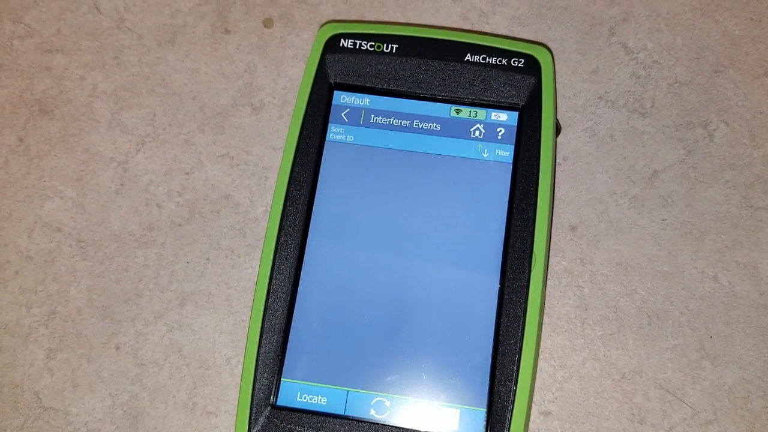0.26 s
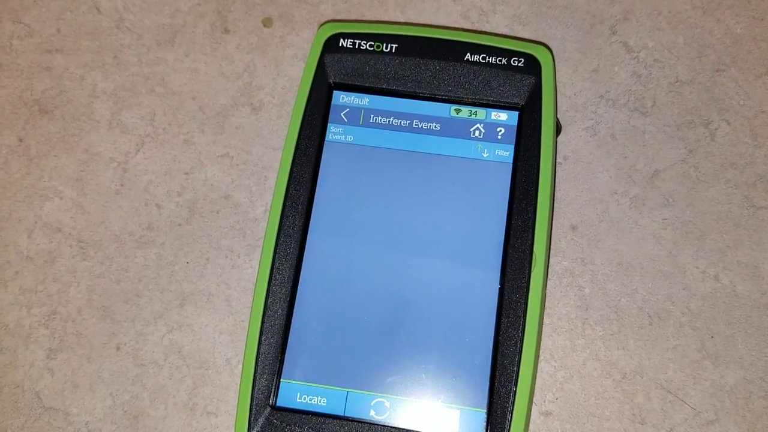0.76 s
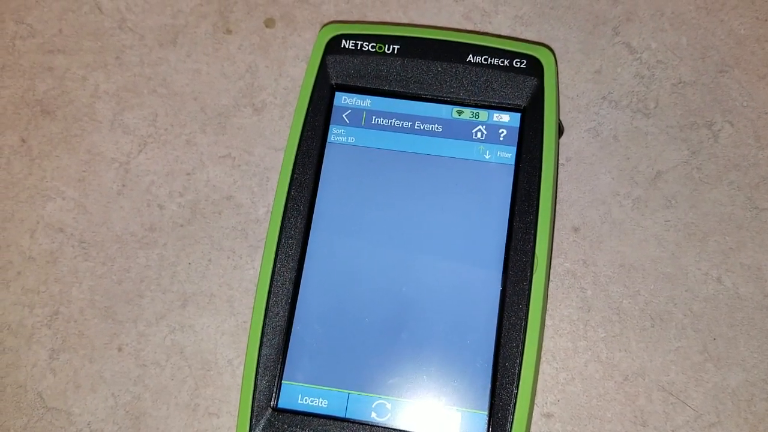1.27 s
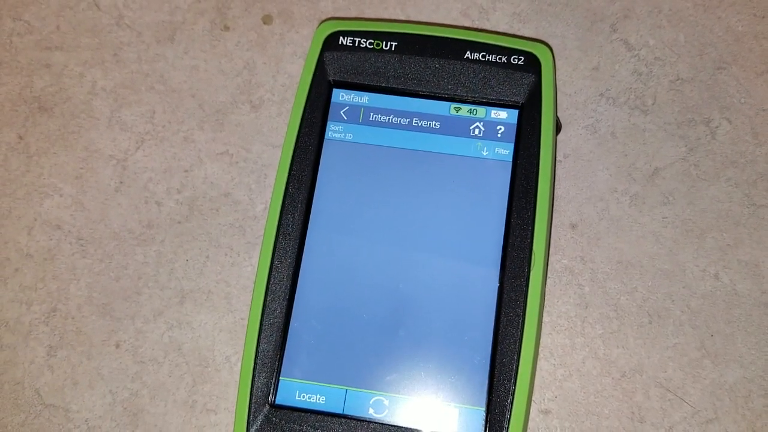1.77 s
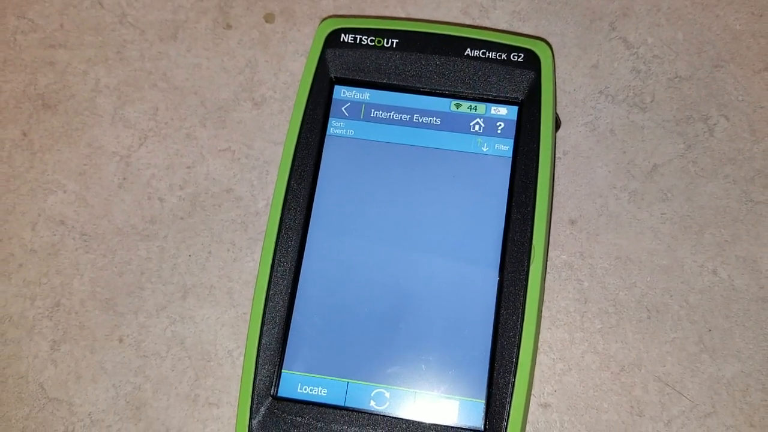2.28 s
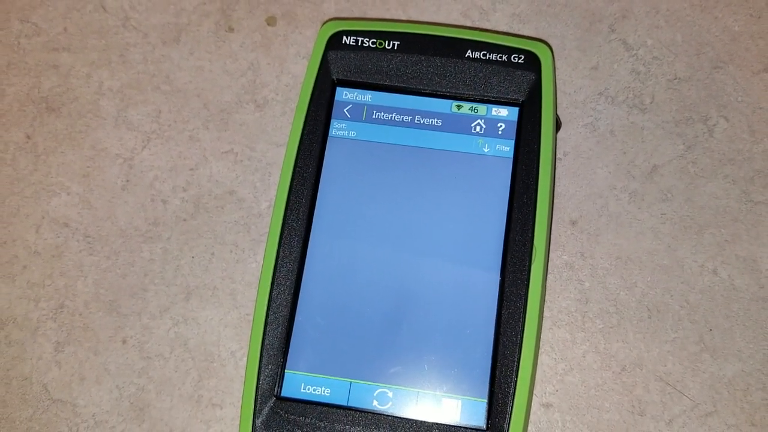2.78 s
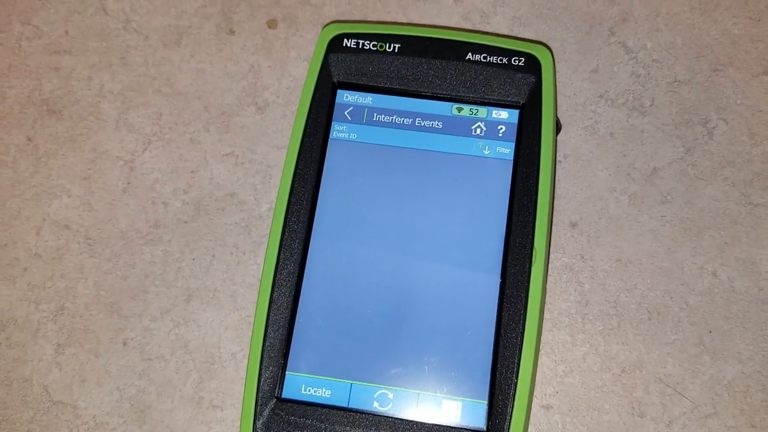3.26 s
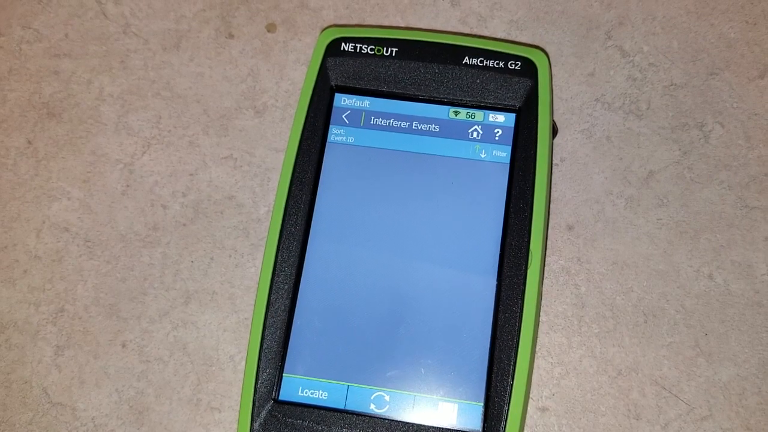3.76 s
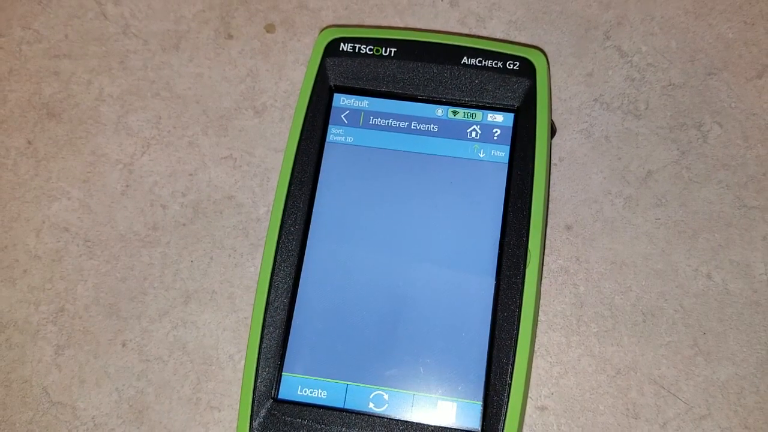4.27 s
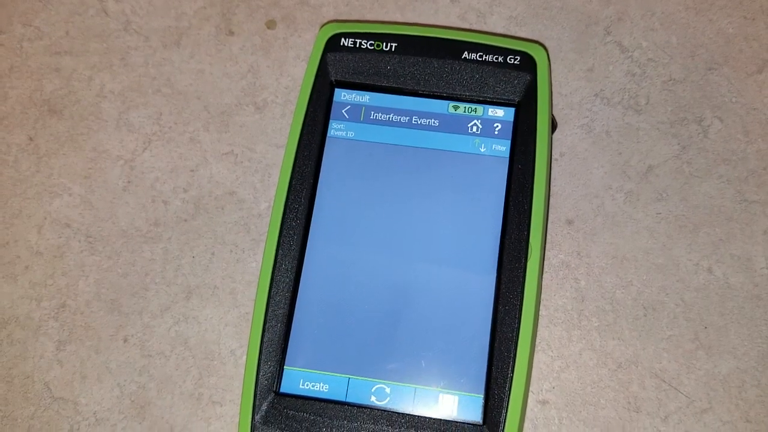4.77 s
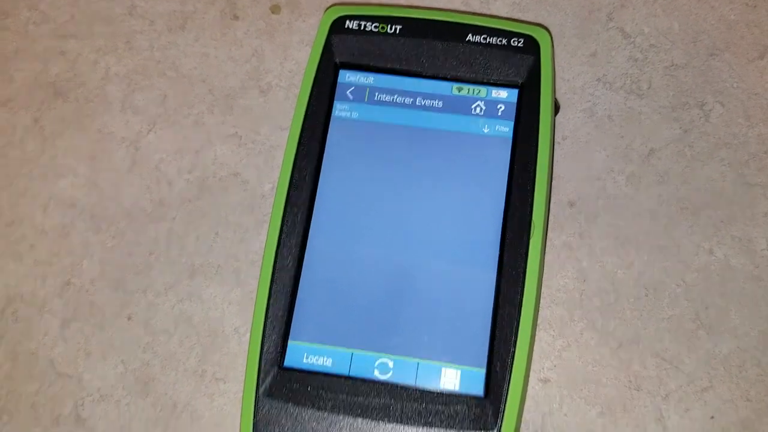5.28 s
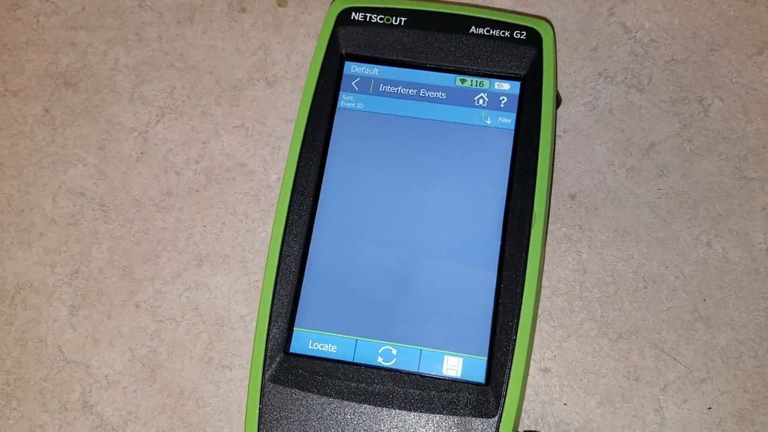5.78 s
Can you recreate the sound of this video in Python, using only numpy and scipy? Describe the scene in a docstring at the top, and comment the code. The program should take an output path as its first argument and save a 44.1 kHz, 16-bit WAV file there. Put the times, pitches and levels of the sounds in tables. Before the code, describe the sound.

Two microwave ovens hum together steadily in a room, low and droning with soft fan hiss, until small dry handling clicks come near the end.

```python
"""Two microwave ovens run in a room, heard by a hand-held pair of microphones: transformers, motors
and fans give steady sums of sines, and the transformer cores buzz on high multiples of the mains.
Shaped noise adds a rumble of thin cases and a hiss of blown air. Near the end the hand shifts its grip:
filtered bursts tick on the left, then ticks and a short chirp of ringing plastic come on the right."""
import sys
import numpy as np
from scipy import signal
from scipy.fft import rfft, irfft, next_fast_len
from scipy.io import wavfile
from scipy.ndimage import uniform_filter1d, map_coordinates

SR = 44100
rng = np.random.default_rng(int(sys.argv[2]) if len(sys.argv) > 2 else 0)


def master_out(mix):
    """Clip the mix to full scale and print it as 16-bit PCM to the path in sys.argv[1]."""
    frames = np.transpose(np.atleast_2d(mix))
    ceiling = np.clip(frames, -1, 1)
    pcm = np.round(ceiling * 32767).astype(np.int16)
    wavfile.write(sys.argv[1], SR, pcm)


N = 266275  # samples
TOP_HZ = 15730  # upper limit of the recorder


def undb(db):
    """Decibel law: amplitude gain of a level."""
    return 10 ** (np.asarray(db) / 20)


def curve(table, hz):
    """Spectral interpolation: each level column read along a logarithmic frequency axis."""
    f, *columns = np.transpose(table)
    return np.array([np.interp(np.log(hz + 1), np.log(f), c) for c in columns])


def walk(rate):
    """Slow random modulation: levels held 1 / rate s and smoothed twice, with a spread near 1."""
    hold = int(SR / rate)
    levels = np.repeat(rng.standard_normal(N // hold + 1), hold)
    smooth = uniform_filter1d(uniform_filter1d(levels, hold), hold)
    return 1.32 * smooth[:N]


# Resonances of cases and room that lift or hollow the noise.
# Each row: frequency in Hz, width in Hz, gain in dB.
RESONANCES = [(150, 6.3, 5.5), (191.6, 9.1, 4), (279.8, 23, 7), (331, 10.7, 11), (359.6, 7.7, 4.5),
              (401.4, 10.5, 7.5), (468.4, 20, 5.5), (257, 13, -5.5), (494, 13, -5.5), (556, 11, -5),
              (714, 15, 2.5), (775, 14, 3.5), (1443, 77, 3.5), (1990, 56, 3.5), (3320, 150, 2),
              (15000, 300, 2)]
RIPPLE_DB, RIPPLE_HZ = 1.4, 20.0  # spread above 800 Hz, spacing of the random knots


def colour(hz):
    """Resonance and interference: modes shape both sides, reflections ripple each side differently."""
    db = sum(lift_db / (1 + (2 * (hz - f) / width) ** 2) for f, width, lift_db in RESONANCES)
    knots = rng.standard_normal((2, 4000))
    ripple = np.array([map_coordinates(side, [hz / RIPPLE_HZ], order=3) for side in knots])
    return undb(db + RIPPLE_DB * ripple * np.clip(hz / 800, 0, 1))


LEFT_LEADS_S = 0.00023  # lead of the common noise on the left
FLICKER_DB, SWELL_DB = 1, 0.5  # spread of the top band's own flicker, and of the shared swell
# Rumble of cases and room, before crossover and resonances.
# Each row: frequency in Hz, left level in dB per Hz, right level in dB per Hz.
RUMBLE_SPECTRUM = [(26, -74, -76), (32, -82, -87), (56, -79.5, -77.5), (85, -70.5, -69), (134, -66, -67.5),
                   (197, -71.5, -67.5), (244, -73.5, -79), (284, -68, -67.5), (357, -70, -71.5),
                   (398, -75.5, -73.5), (526, -72, -72), (645, -70, -71), (772, -72, -74.5),
                   (953, -80, -80.5)]
# Air through fans and vents, then the microphones' own hiss, before crossover and resonances.
# Each row: frequency in Hz, left level in dB per Hz, right level in dB per Hz.
HISS_SPECTRUM = [(700, -90, -89), (975, -81, -85), (1190, -86.5, -81.5), (1420, -81, -83),
                 (1880, -84.5, -83.5), (2800, -89.5, -88), (3970, -91, -90.5), (5140, -99, -96.5),
                 (6500, -100, -96.5), (8440, -104, -110), (11000, -104, -109), (12500, -103, -105),
                 (14000, -101, -107), (15400, -97, -114)]
# Share of the noise power common to both microphones.
# Each row: frequency in Hz, likeness from 0 to 1.
COMMON_SHARE = [(26, .99), (140, 1), (220, 0.65), (285, 0.88), (400, 0.52), (560, 0.73), (690, 0.71),
                (900, 0.29), (2500, 0.02), (4000, 0.02)]


def air():
    """Partly coherent noise: third-octave bands swell together and flicker alone, most in the treble."""
    size = next_fast_len(N)
    hz = np.arange(size // 2 + 1) * SR / size
    rumble = undb(curve(RUMBLE_SPECTRUM, hz)) ** 2 / (1 + (hz / 1100) ** 6)
    hiss = undb(curve(HISS_SPECTRUM, hz)) ** 2 / (1 + (700 / (hz + 1)) ** 6)
    power = rumble + hiss

    like = np.clip(curve(COMMON_SHARE, hz)[0], 0, 1)
    common, left, right = rfft(rng.standard_normal((3, size)))
    lead = np.exp(2j * np.pi * hz * LEFT_LEADS_S)
    left = np.sqrt(like) * common * lead + np.sqrt(1 - like) * left
    right = np.sqrt(like) * common + np.sqrt(1 - like) * right
    both = np.sqrt(power * SR / 2) * colour(hz) * np.array([left, right])

    out = np.zeros((2, N))
    swell_db = SWELL_DB * walk(1)
    step = 3 * np.log2(hz / 20 + 1e-9)  # third octaves above 20 Hz
    for k in range(31):
        band = np.cos(np.pi / 2 * np.clip(step - k, -1, 1)) ** 2  # neighbours sum to 1
        flicker_db = FLICKER_DB * k / 30 * walk(25.02)
        out += undb(swell_db + flicker_db) * irfft(both * band, size)[:, :N]
    return out


CREEP_S, CREEP_COUNT = (5.215, 5.27), 9  # start and end
CREEP_DB, CREEP_RANGE_DB, CREEP_LEFT_DB = -40, 2, 13  # centre, plus or minus, left minus right
CREEP_LOW_HZ = (3000, 11000)  # range of the lower band edge


def creep():
    """Stick-slip crackle on the left: faint ticks at random moments, at most an octave wide."""
    when, size, pitch = rng.random((CREEP_COUNT, 3)).T
    low_hz = CREEP_LOW_HZ[0] + pitch * (CREEP_LOW_HZ[1] - CREEP_LOW_HZ[0])
    start = CREEP_S[0] + when * (CREEP_S[1] - CREEP_S[0])
    db = CREEP_DB + CREEP_RANGE_DB * (2 * size - 1)
    return [(s, level, CREEP_LEFT_DB, f, min(2 * f, TOP_HZ)) for s, level, f in zip(start, db, low_hz)]


TICK_T60_S = 0.0058  # decay of the rattle by 60 dB
TICK_DIP_HZ, TICK_DIP_WIDTH_HZ = 10200, 1800  # a dip in the ticks' treble near 10 kHz
# Dry ticks of the grip. Each row: start in seconds, peak level in dB before the treble dip is cut,
# left minus right in dB, lower band edge in Hz, upper band edge in Hz.
GRIP_TICKS = [(5.2000, -21, 16, 1100, 2300), (5.2291, -27, 14, 2100, 12000), (5.2593, -21, 18, 1800, 14000),
              (5.2824, -30, 12, 1000, 3000), (5.9312, -27, -11, 2600, 6500), (5.9453, -20, -9, 3800, 5800),
              (5.9662, -42, -4, 10000, 15000)]


def ticks():
    """Impulse excitation: a sharp snap and a very short decaying rattle pass through a broad band."""
    out = np.zeros((2, N))
    t = np.arange(400) / SR
    for start, db, pan_db, low_hz, high_hz in GRIP_TICKS + creep():
        burst = 0.17 * rng.standard_normal(len(t)) * undb(-60 * t / TICK_T60_S)
        burst[0] = 1  # the snap
        burst = signal.lfilter(*signal.butter(2, min(high_hz, TOP_HZ), fs=SR), burst)
        burst = signal.lfilter(*signal.butter(3, low_hz, "high", fs=SR), burst)
        burst[0] += 0.3 * np.abs(burst).max()  # the very edge reaches the top treble
        i = int(start * SR)
        gains = undb(db + np.minimum([pan_db, -pan_db], 0))  # the farther side is lowered
        out[:, i:i + len(t)] += np.outer(gains, burst / np.abs(burst).max())
    return signal.lfilter(*signal.iirnotch(TICK_DIP_HZ, TICK_DIP_HZ / TICK_DIP_WIDTH_HZ, fs=SR), out)


def ring(x, hz, width_hz):
    """Cascaded resonance: the envelope of one applied three times swells to 1 for a unit blow, then dies."""
    t = np.arange(512) / SR
    envelope = t ** 2 * np.exp(-np.pi * width_hz * t)
    response = envelope / envelope.max() * np.sin(2 * np.pi * hz * t)
    return signal.fftconvolve(x, response)[:len(x)]


HARD_SLIP_S, HARD_SLIP_DB = 6.0022, -11
SLIP_GAP_S, SLIP_JITTER = .0026, .15  # jitter is a fraction of the gap
SLIPS_BEFORE, SLIPS_AFTER = 4, 3
# The slopes of the small slips meet at SMALL_SLIP_DB; each step away from the hard slip lowers them.
SMALL_SLIP_DB, BUILD_DB_PER_SLIP, FADE_DB_PER_SLIP = -22, 4, 3
CHIRP_LEFT_DB = -13.5  # left minus right
# Modes of the plastic shell. Each row: frequency in Hz, width in Hz, level in dB.
SHELL_MODES = [(3070, 450, -16), (3800, 450, -17), (4540, 450, -21), (5780, 850, 0), (7100, 550, -21)]


def chirp():
    """Stick-slip: small slips build to a hard one and fade, ringing a shell nearer the right microphone."""
    k = np.arange(-SLIPS_BEFORE, SLIPS_AFTER + 1)
    slip_db = SMALL_SLIP_DB - np.where(k < 0, -k * BUILD_DB_PER_SLIP, k * FADE_DB_PER_SLIP)
    slip_db[k == 0] = HARD_SLIP_DB
    jitter = SLIP_JITTER * rng.standard_normal(len(k)) * (k != 0)
    start = HARD_SLIP_S + SLIP_GAP_S * (k + jitter)
    slips = np.zeros(N)
    slips[(start * SR).astype(int)] = undb(slip_db)
    sound = sum(undb(db) * ring(slips, hz, width_hz) for hz, width_hz, db in SHELL_MODES)
    return np.array([undb(CHIRP_LEFT_DB) * sound, sound])


ROOM_T60_S, ROOM_DB = 0.14, -13.5  # 60 dB decay time, energy of the tail


def room(x):
    """Diffuse reverberation: a thin decaying noise tail, different on each side, follows the sound."""
    t = np.arange(SR // 4) / SR
    tail = rng.standard_normal((2, len(t))) * undb(-60 * t / ROOM_T60_S) * (t > .002)
    tail *= undb(ROOM_DB) / np.sqrt(np.sum(tail ** 2, axis=1, keepdims=True))
    return x + signal.fftconvolve(x.sum(axis=0, keepdims=True), tail, axes=1)[:, :N]


MAINS_HZ = 60.04
BUZZ_SCATTER_DB, BUZZ_RIGHT_DB = 5.0, -7.0  # spread from line to line, right minus left
# Faint buzz of the transformer cores. Each row: frequency in Hz, typical line level in dB on the left.
BUZZ_SPECTRUM = [(1300, -92), (3000, -87), (5500, -91), (7200, -95), (8300, -92), (9700, -92), (10800, -97),
                 (13000, -97)]


def buzz():
    """Fourier series: many uneven harmonics make one mains cycle, which repeats."""
    k = np.arange(22, 220)
    db = curve(BUZZ_SPECTRUM, k * MAINS_HZ)[0] + BUZZ_SCATTER_DB * rng.standard_normal((2, len(k)))
    db[1] += BUZZ_RIGHT_DB
    lines = np.zeros((2, 2049), complex)
    lines[:, k] = 2048 * np.sqrt(2) * undb(db) * np.exp(2j * np.pi * rng.random(db.shape))
    place = np.arange(N) * MAINS_HZ / SR % 1 * 4096  # position in the 4096-sample cycle
    return np.array([map_coordinates(c, [place], order=3, mode="grid-wrap") for c in irfft(lines)])


WAVER_HZ, WAVER_DB = .06, .5  # pitch and level spread at waver 1


def tones(rows, waver):
    """Superposition: steady sines at RMS levels, whose pitch and level wander a little."""
    out = np.zeros((2, N))
    for hz, left_db, right_db, lead in rows:
        pitch = hz + waver * WAVER_HZ * walk(2.95)
        phase = 2 * np.pi * (np.cumsum(pitch) / SR + rng.random())
        gain = np.sqrt(2) * undb(waver * WAVER_DB * walk(2.2))
        left = undb(left_db) * np.sin(phase + lead)
        right = undb(right_db) * np.sin(phase)
        out += gain * np.array([left, right])
    return out


# Two lone tones. Each row: frequency in Hz, left level in dB, right level in dB, left lead in radians.
LONE_TONES = [(331.6, -56.0, -54.5, -.7), (352.86, -59.5, -63.7, .1)]


def lone_tones():
    """Pure tones: two sines, each given by its own frequency."""
    return tones(LONE_TONES, 0.75)


def shaft(table, turn_hz):
    """Sidebands: the magnetic pull throbs at twice the mains and shifts some shaft tones by that much."""
    return [(k * turn_hz + shift * 2 * MAINS_HZ, *rest) for k, shift, *rest in table]


FAN_HZ = 23.7615  # turns per second
# Fan tones. Each row: multiple of the turn rate, shift in throbs,
# left level in dB, right level in dB, left lead in radians.
FAN_TONES = [(4, 0, -52.4, -53.4, .2), (8, 0, -60.8, -61.0, .4), (12, 0, -52.4, -54.2, .2),
             (21, 0, -67.5, -67.0, .7), (22, 0, -62.2, -59.3, 0.0), (23, 0, -57.1, -58.4, -1.3),
             (24, 0, -77.3, -60.1, 2.6), (22, -1, -70.7, -58.8, -.1), (21, 1, -60.9, -56.1, 0.0),
             (22, 1, -70.7, -60.6, -1.5), (23, 1, -47.6, -56.9, .2)]


def fans():
    """Rotational tones: multiples of the fan's turn rate, some shifted, slipping a little."""
    return tones(shaft(FAN_TONES, FAN_HZ), 0.62)


MOTOR_HZ = 38.4425  # turns per second
# Motor tones. Each row: multiple of the turn rate, shift in throbs,
# left level in dB, right level in dB, left lead in radians.
MOTOR_TONES = [(2, 0, -58.3, -59.6, 0.0), (4, 0, -36.0, -35.9, .3), (6, 0, -66.3, -62.1, .7),
               (7, 0, -60.7, -62.1, .3), (8, 0, -54.3, -49.4, .6), (12, 0, -60.7, -65.9, 1.4),
               (16, 0, -64.7, -65.2, -.3), (18, 0, -63.4, -69.8, 1.0), (20, 0, -62.0, -62.5, 1.9),
               (1, 1, -56.8, -56.3, .3), (2, 1, -59.4, -60.8, .3), (3, 1, -58.0, -61.0, 1.1)]


def motors():
    """Rotational tones: multiples of the motor's turn rate, some shifted, slipping the most."""
    return tones(shaft(MOTOR_TONES, MOTOR_HZ), 1.0)


# Transformer hum. Each row: multiple of the mains, left level in dB, right level in dB,
# left lead in radians.
HUM_TONES = [(2, -40.4, -39.9, 0.0), (3, -49.0, -53.0, .4), (4, -48.7, -48.4, 1.1), (5, -62.8, -61.1, .1),
             (6, -60.1, -56.1, .8), (12, -64.5, -63.8, 1.0), (16, -71.4, -67.2, -1.5),
             (20, -73.6, -69.6, 3.1)]


def transformers():
    """Harmonic hum: multiples of the mains, the steadiest of the wandering tones."""
    return tones([(k * MAINS_HZ, *rest) for k, *rest in HUM_TONES], 0.18)


def scene():
    """Superposition of ovens, air and the hand; only the hand's sounds pass through the room tail."""
    ovens = transformers() + motors() + fans() + lone_tones()
    return ovens + buzz() + air() + room(ticks() + chirp())


def record(dry):
    """Band limiting: the recorder's elliptic low-pass cuts the top steeply."""
    return signal.sosfilt(signal.ellip(16, .5, 60, TOP_HZ, fs=SR, output="sos"), dry)


dry = scene()
out = record(dry)
master_out(out)
```